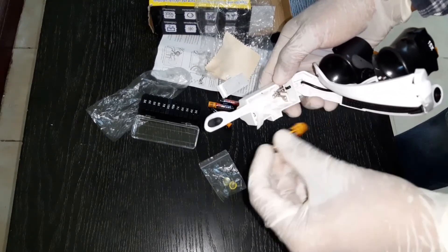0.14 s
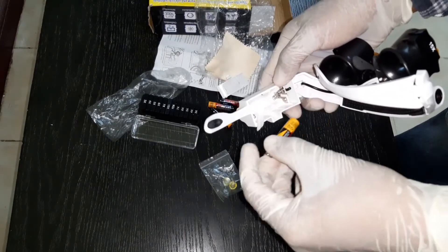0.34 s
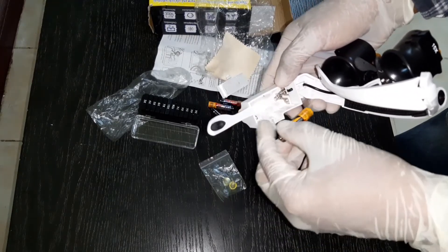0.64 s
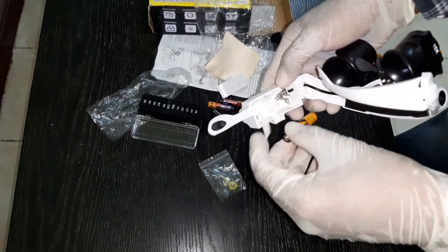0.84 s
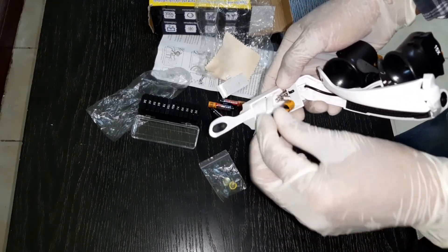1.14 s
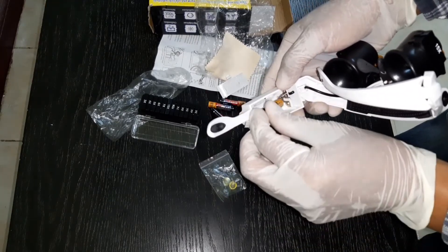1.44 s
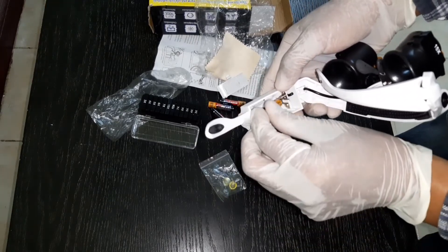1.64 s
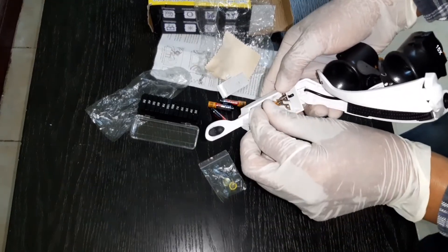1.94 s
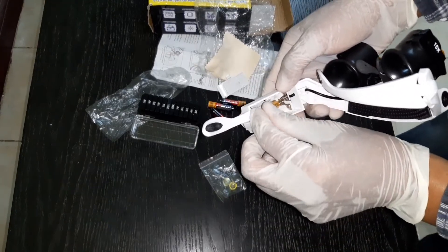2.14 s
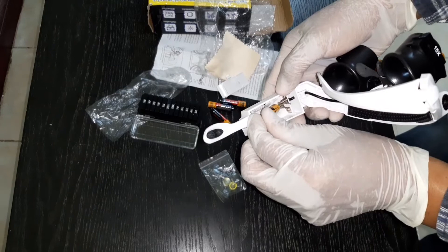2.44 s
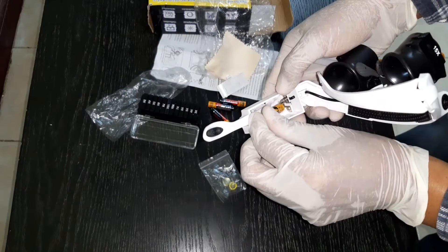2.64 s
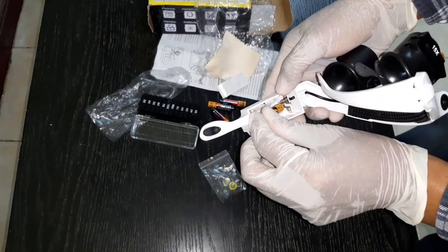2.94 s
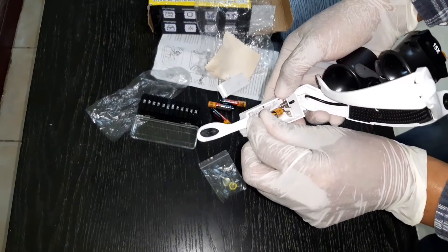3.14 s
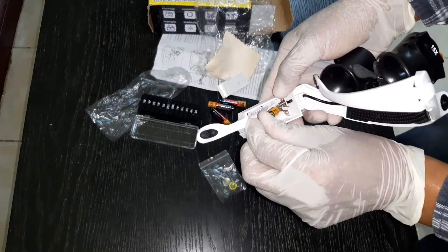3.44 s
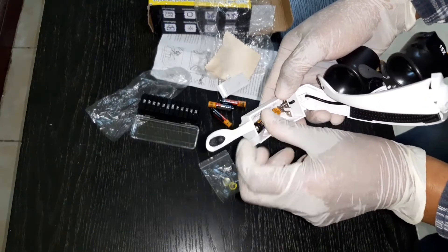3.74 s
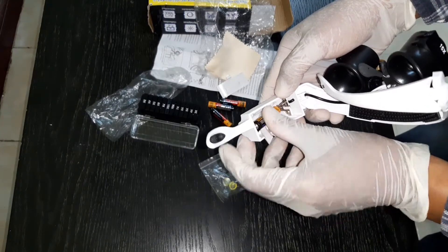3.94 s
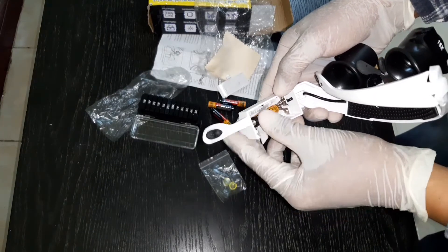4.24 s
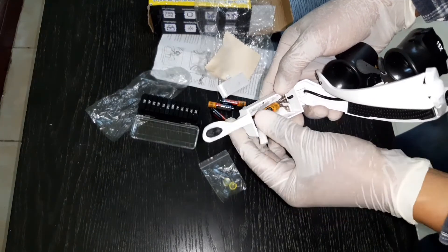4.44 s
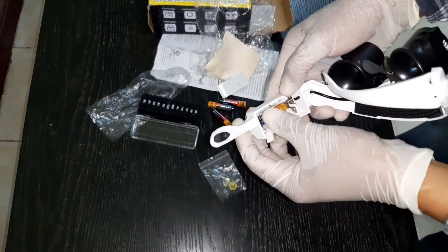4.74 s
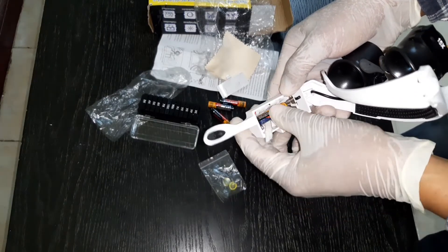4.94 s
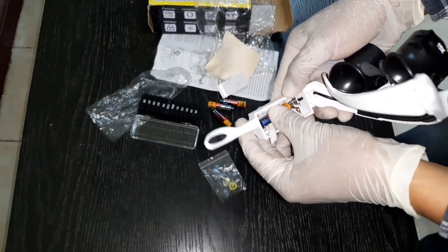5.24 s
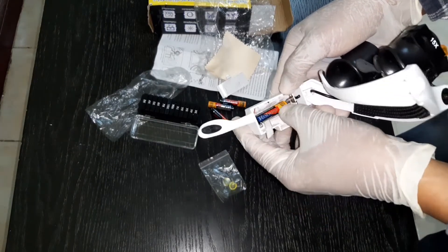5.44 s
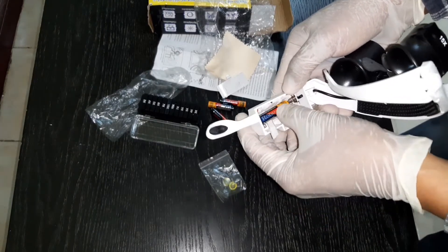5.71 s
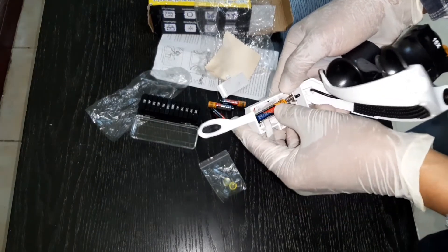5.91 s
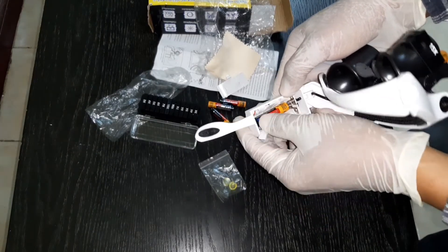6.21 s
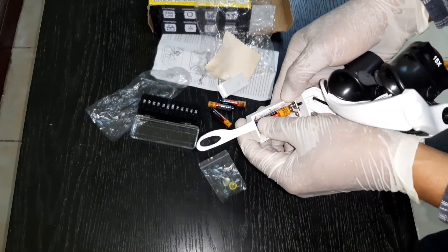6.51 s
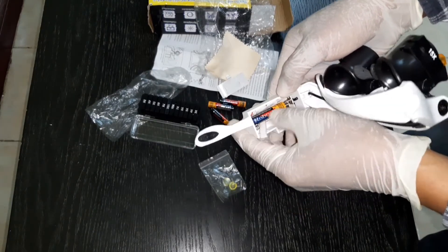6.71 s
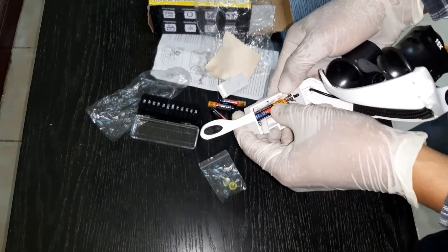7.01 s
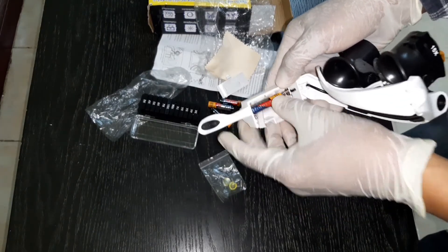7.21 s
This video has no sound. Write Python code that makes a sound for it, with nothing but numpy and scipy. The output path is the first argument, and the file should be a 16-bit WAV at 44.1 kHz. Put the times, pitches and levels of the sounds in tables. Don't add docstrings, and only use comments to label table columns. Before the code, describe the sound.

Gloved hands press small batteries into a plastic compartment, heard close up in a small hard room. Faint latex rubbing and light ticks come first, then a sharp cluster of clicks around the middle, a hard snap at five seconds and another loud click later. Contact springs ring briefly and each click gets a short dense echo. A low, pulsing mains and fan hum stays underneath with slight hiss.

```python
import sys
import numpy as np
from scipy import signal
from scipy.fft import rfft, irfft, next_fast_len
from scipy.io import wavfile
from scipy.ndimage import uniform_filter1d

SR = 44100
rng = np.random.default_rng(int(sys.argv[2]) if len(sys.argv) > 2 else 0)


def undo_db(level):
    steps = np.asarray(level, float) / 20
    return 10 ** steps


def file_out(sig):
    cols = np.atleast_2d(sig).T
    lim = np.clip(cols, -1, 1)
    pcm = np.round(lim * 32767).astype(np.int16)
    wavfile.write(sys.argv[1], SR, pcm)


N = 324928


def unit(x):
    return x / np.sqrt(np.mean(x ** 2) + 1e-20)


def peak(x):
    return x / np.abs(x).max()


def along(points, hz):
    f, v = np.transpose(points)
    return np.interp(np.log(hz + 1), np.log(f + 1), v)


def add(mix, s, x):
    part = mix[round(s * SR):][:len(x)]
    part += x[:len(part)]


def filtered(x, response):
    n = x.shape[-1]
    m = next_fast_len(n + 2048, real=True)
    return irfft(rfft(x, m) * response(np.fft.rfftfreq(m, 1 / SR)), m)[..., :n]


def shaped(gain):
    m = next_fast_len(N, real=True)
    z = rng.standard_normal(m + 2).view(complex)[:m // 2 + 1]
    return unit(irfft(z * gain(np.fft.rfftfreq(m, 1 / SR)), m)[:N])


def noise(spectrum):
    return shaped(lambda hz: undo_db(along(spectrum, hz)))


def resonance(f, hz, width_hz):
    return 1j * f * width_hz / (hz * hz - f * f + 1j * f * width_hz)


def ring(t, hz, t60, rise):
    return np.sin(2 * np.pi * hz * t) * undo_db(-60 * t / t60) * (1 - np.exp(-t / rise))


def drone(hz, width_hz, steady):
    wander = shaped(lambda f: 1 / (1 + (2 * (f - hz) / width_hz) ** 2))
    return unit(steady * np.sin(2 * np.pi * hz * np.arange(N) / SR) + wander)


def swells(rows):
    t = np.arange(0, N + 64, 64) / SR
    rise_db = sum(db * np.exp(-((t - s) / half_width_s) ** 2) for s, db, half_width_s in rows)
    return np.interp(np.arange(N) / SR, t, undo_db(rise_db))


# time in seconds, level over rest in dB, half width in seconds.
THROBS = [(.19, 12, .12), (.72, 12, .18), (1.15, 12, .06), (1.45, 7, .15), (1.72, 11, .07), (1.95, 10, .1),
          (2.26, 10, .09), (2.52, 11, .07), (2.92, 13, .25), (3.48, 13, .09), (3.84, 12, .06),
          (4.12, 13, .14), (4.68, 16, .17), (5.2, 13, .13), (5.8, 11, .3), (6.43, 13, .14), (6.92, 16, .12),
          (7.15, 10, .12)]
# frequency in Hz, width in Hz, level in dB, steadiness (sine over noise).
TONES = [(49.3, 4, -59.5, 2.1), (199.7, 3.5, -64, 1.3), (301.5, 4.1, -67, 0.68), (420, 8.9, -69, 0.45),
         (1141, 71, -76, .3), (1965, 53, -85, .2), (2700, 71, -86, .2)]


def mains():
    x = undo_db(-60.5) * swells(THROBS) ** .78 * drone(100, 7, steady=2.3)
    return x + sum(undo_db(db) * drone(hz, width_hz, steady) for hz, width_hz, db, steady in TONES)


# time in seconds, level over rest in dB, half width in seconds.
SURGES = [
    (.8, 7, .2),
    (1.77, 8, .06),
    (3.46, 8, .06),
    (3.96, 9, .08),
    (4.55, 6, .1),
    (6.42, 8, .08),
    (7.07, 11, .08),
    (7.29, 13, .09),
]
# frequency in Hz, density in dB per Hz.
RUMBLE = [(20, -48), (33, -19), (45, 1), (70, 3), (90, -8), (130, -40.5)]
# frequency in Hz, density in dB per Hz.
AIR = [(35, -38), (60, -9), (108, -3.5), (130, -12), (161, -9.5), (206, -15), (226, -18), (303, -9),
       (328, -19.5), (426, -11.5), (537, -23), (1030, -32.5), (1340, -28), (2400, -50.5), (3120, -82),
       (5280, -120)]


def fan():
    blades = undo_db(-62.5) * swells(SURGES) * drone(164, 12, steady=1.1)
    rumble_db = -59.5 + .25 * np.arange(N) / SR
    return blades + undo_db(rumble_db) * noise(RUMBLE) + undo_db(-52.5) * noise(AIR)


# frequency in Hz, density in dB per Hz.
HISS = [(1060, -37.5), (1800, -10), (1970, 1), (2060, -9), (2550, -12), (2740, -6), (3840, -14),
        (7030, -10.5), (7630, -8.5), (12500, -19), (14500, -26.5), (16000, -25)]


def hiss():
    return undo_db(-76.9) * noise(HISS)


# start in seconds, length in seconds, level in dB.
STROKES = [(0, .24, -75.5), (.27, .08, -72.5), (.6, .07, -79), (.8, .24, -75), (1.05, .13, -78),
           (1.17, .08, -69), (1.26, .07, -78.5), (2.13, .12, -81.5), (4.8, .16, -78), (4.97, .11, -71.5),
           (7.07, .24, -70)]
# frequency in Hz, density in dB per Hz.
LATEX = [(2500, -25), (4500, -0.5), (6500, 3.5), (9000, -4.5), (12000, -26.5)]


def glove():
    drag = np.zeros(N)
    for s, length_s, db in STROKES:
        arch = np.abs(np.sin(np.linspace(0, np.pi, round(length_s * SR))))
        add(drag, s, undo_db(db) * arch ** 1.5)
    grains = undo_db(5 * unit(uniform_filter1d(rng.standard_normal(N), size=90)))
    return drag * unit(grains * noise(LATEX))


# frequency in Hz, t60 in seconds.
WALLS = [(500, .35), (1500, 0.41), (3500, 0.35), (7000, 0.3), (13000, 0.33)]
# frequency in Hz, level in dB.
WALL_TONE = [(500, -6), (1200, -5.5), (3500, -3.5), (7000, -8), (10000, -5.5), (14000, -10.5)]


def walls(count):
    build_up_s = .0034
    hz, t = np.fft.rfftfreq(256, 1 / SR), np.arange(110) * 128 / SR
    z = rng.standard_normal((count, len(hz), 2 * len(t))).view(complex)
    decay_db = along(WALL_TONE, hz)[:, None] - 60 * t / along(WALLS, hz)[:, None]
    tails = signal.istft(z * undo_db(decay_db), SR, nperseg=256)[1]
    tails = tails * (1 - np.exp(-np.arange(tails.shape[1]) / SR / build_up_s))
    return iter(tails / np.linalg.norm(tails, axis=1, keepdims=True))


def blurred(x, blur_s):
    return x * np.exp(-((np.arange(len(x)) - np.abs(x).argmax()) / SR / blur_s) ** 2)


def in_room(x, broad, tail, tonal, wet_db=-8):
    spread = tonal * x + broad * np.linalg.norm(x) / np.linalg.norm(broad)
    out = undo_db(wet_db) * signal.fftconvolve(spread, tail)
    return out + np.pad(x, (0, len(out) - len(x)))


# frequency in Hz, width in Hz, level in dB.
HOLDER = [(1230, 300, -3.5), (1900, 250, -4.5), (2680, 170, 2.6), (3820, 110, -11), (4780, 250, -8),
          (5650, 260, -6), (6340, 310, -2), (7960, 1700, -17.5), (9270, 520, -16), (10700, 500, -20),
          (13300, 210, -28.5), (14000, 410, -33)]


def holder(force, shift_db, widen=1):
    def body(f):
        return sum((-1) ** k * undo_db(db + shift_db[k]) * resonance(f, hz, widen * width_hz)
                   for k, (hz, width_hz, db) in enumerate(HOLDER))
    return filtered(force, body)


def tick(db, shell_hz, edge_hz, edge_db, t60):
    t = np.arange(SR // 20) / SR
    rise_s = .0002
    grit = rng.standard_normal((3, len(t))) * undo_db(-60 * t / (0.74 * t60)) * (1 - np.exp(-t / rise_s))
    grit[:, 0] += 4.5
    shell_crack = peak(filtered(grit[0], lambda f: resonance(f, shell_hz, .35 * shell_hz)))
    shell = ring(t, shell_hz, t60, rise_s) + .6 * shell_crack
    edge_crack = peak(filtered(grit[1], lambda f: resonance(f, edge_hz, .4 * edge_hz) ** 2))
    edge = .6 * ring(t, edge_hz, .5 * t60, rise_s) + edge_crack
    high = np.array([hz > 3300 for hz, _, _ in HOLDER])
    shift_db = rng.normal(0, 3, len(high)) + high * (1.2 * edge_db + 16.5)
    knock = peak(holder(grit[2], shift_db, widen=1.4))
    knock_db = -1 + .5 * max(edge_db + 11, 0)
    hard = shell + undo_db(1.36 * edge_db + 17.5) * edge + undo_db(knock_db) * knock
    soft_hz = max(1.9 * edge_hz, 16000 * undo_db(0.06 * (db + 30.5)))
    return undo_db(db - .3) * peak(filtered(hard, lambda f: 1 / (1 + 1j * f / soft_hz) ** 4))


# time in seconds, peak in dB, shell tone in Hz, edge tone in Hz.
CAP_TICKS = [(0.304, -56, 1290, 5530), (0.6444, -61, 1360, 7630), (1.1754, -45.5, 1150, 5100),
             (1.651, -59, 1100, 4500), (1.6604, -52.5, 1170, 4070), (1.977, -61, 1230, 4140),
             (2.4564, -57, 1290, 4590), (3.6228, -46, 2580, 7000), (3.6337, -24.5, 4700, 7600),
             (3.635, -24, 1370, 7000), (3.6377, -32.5, 1400, 6830), (3.678, -34, 2700, 4130),
             (4.5204, -47, 1480, 4960), (4.5255, -35, 1360, 5200), (4.533, -36, 1370, 7700),
             (4.5624, -46, 2003, 4120), (4.6043, -26, 1550, 7400), (5.2436, -45, 1760, 7800),
             (5.3463, -43, 1365, 6800), (5.3941, -41, 3580, 6360), (5.5339, -52.5, 1500, 6520),
             (6.349, -46, 1230, 6930), (6.3671, -17, 3180, 7010), (6.41, -32, 4020, 6600),
             (6.5957, -55.5, 1200, 8700), (6.711, -39.5, 2735, 4790)]
# time in seconds, peak in dB, shell tone in Hz, edge tone in Hz.
RIM_TICKS = [(1.6102, -48, 2690, 4540), (1.631, -48, 2700, 4700), (1.7925, -35.5, 2000, 4400),
             (1.9914, -38, 1400, 3650), (2.6648, -46, 1360, 4600), (3.63, -39, 2480, 4400),
             (3.657, -21.5, 2760, 3820), (4.6087, -17, 2225, 3780), (4.6425, -38, 2200, 7700),
             (5.3551, -38.5, 4800, 6600), (6.1251, -41, 1324, 3830), (6.1813, -39.5, 3650, 7600),
             (6.3693, -16.5, 1630, 3640), (6.6148, -45, 1110, 7200), (6.678, -41.5, 1480, 4400)]
# time in seconds, peak in dB, shell tone in Hz.
SIDE_TICKS = [(1.9849, -38.5, 1490), (2.004, -42, 2150), (2.4886, -37.5, 1400), (2.6786, -40, 1470),
              (3.6413, -21.5, 2700), (3.6435, -28, 1420), (4.1876, -41.5, 1400), (4.3982, -44, 2140),
              (4.4243, -34.5, 2713), (4.5397, -22.5, 2100), (4.6219, -22.5, 2700), (5.2569, -36.5, 2650),
              (6.3644, -20.5, 1620)]


def ticks(mix, tails):
    rows = [(*r, -7.5, .019) for r in CAP_TICKS]
    rows += [(*r, -13, .018) for r in RIM_TICKS]
    rows += [(*r, 3900, -20, .021) for r in SIDE_TICKS]
    for s, *settings in rows:
        x = tick(*settings)
        add(mix, s + 0.00045, in_room(x, blurred(x, 0.0003), next(tails), tonal=0.3, wet_db=-11.8))


# time in seconds, frequency in Hz, level in dB, t60 in seconds.
SPRINGS = [(1.612, 4480, -64, .12), (1.661, 7300, -60, .02), (1.661, 10800, -57, .015),
           (1.764, 4100, -63, .1), (1.765, 4450, -60, .12), (1.976, 8000, -64, .05),
           (2.407, 5950, -70, .25), (3.3, 4500, -71, .25), (4.541, 2100, -47, .18), (4.543, 4050, -46, .15),
           (4.563, 4200, -48.5, .15), (6.37, 1640, -38.5, .3), (6.37, 3230, -41, .38),
           (6.37, 2950, -48, .3), (6.63, 7340, -70, .29)]
# frequency in Hz, level in dB, t60 in seconds.
COIL = [(1490, -50, .05), (2650, -49, .064), (2970, -61, .06), (3970, -46, .054), (4500, -41.5, .038),
        (6100, -54, .022), (7950, -52, .025), (10500, -53, .012)]


def springs(mix, tails):
    t = np.arange(SR // 4) / SR
    pluck_s = 3.598
    for s, hz, db, t60 in SPRINGS + [(pluck_s, *mode) for mode in COIL]:
        buzz = unit(uniform_filter1d(rng.standard_normal(len(t)), size=120))
        coil = undo_db(db) * (0.75 + .45 * buzz) * ring(t, hz, t60, .018 * t60)
        add(mix, s, in_room(coil, blurred(coil, 0.0019), next(tails), tonal=0.52))


# frequency in Hz, density in dB per Hz.
SCATTER = [(290, -57), (500, -27.5), (859, -18), (1320, -8), (1770, -1), (2170, -12.5), (2430, -3.5),
           (3720, -0.5), (5160, -12), (8370, -15.5), (15000, -47)]
# time in seconds, force in dB.
SNAP = [
    (5.0681, -9),
    (5.0685, -2),
    (5.0688, -12),
    (5.0693, -4.5),
    (5.0698, -6.5),
    (5.0722, -10),
    (5.0729, -17),
]


def snap(tail):
    force = np.zeros(SR // 10)
    for s, db in SNAP:
        add(force, s - SNAP[0][0], undo_db([db + 22.8]))
    first = np.roll(force * (np.arange(len(force)) == 0), 120)
    broad = filtered(first, lambda f: undo_db(along(SCATTER, f) - along(WALL_TONE, f)))
    body = holder(force, np.zeros(len(HOLDER)))
    loud = in_room(body, broad, tail, tonal=0.31, wet_db=-13)
    return signal.sosfilt(signal.cheby2(14, 45, 14900, fs=SR, output="sos"), loud)


def clicks():
    mix, tails = np.zeros(N), walls(count=90)
    ticks(mix, tails)
    springs(mix, tails)
    add(mix, SNAP[0][0] - .0004, snap(next(tails)))
    return filtered(mix, lambda f: (1j * f / (520 + 1j * f)) ** 2)


# frequency in Hz, density in dB per Hz.
TRACE = [(24, -62), (40, -32), (491, -25.5), (810, -3), (1340, -25), (1760, -0.5), (3140, -13.5),
         (3930, -9), (16000, -5.5)]


def scene():
    hits, t = clicks(), np.arange(SR // 10) / SR
    snap_s = SNAP[0][0]
    trace = undo_db(-83.5) * noise(TRACE)
    snap_side = filtered(hits[round(snap_s * SR):][:len(t)], lambda f: resonance(f, 2600, 1200))
    add(trace, snap_s, -undo_db(-17) * snap_side * np.exp(-t / .012))
    add(hits, snap_s, undo_db(-35) * ring(t, 300, .025, .0012))
    mono = mains() + fan() + hiss() + glove() + hits
    return np.array([mono + trace, mono - trace])


def low_pass(x):
    return signal.sosfilt(signal.butter(12, 16470, fs=SR, output="sos"), x)


def record(dry):
    top_hz = 15850
    mix = filtered(dry, lambda hz: hz < top_hz)
    return low_pass(mix)


dry = scene()
out = record(dry)
file_out(out)
```